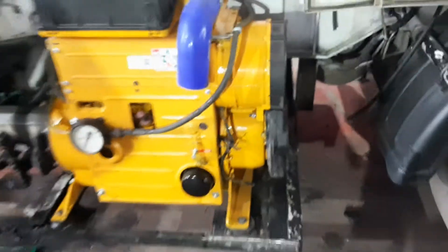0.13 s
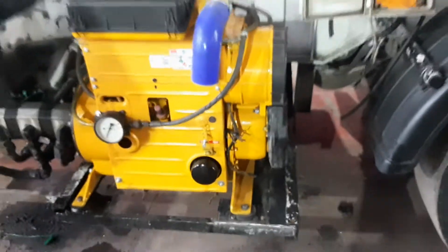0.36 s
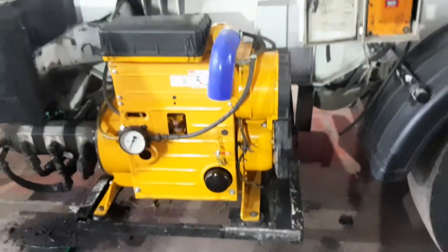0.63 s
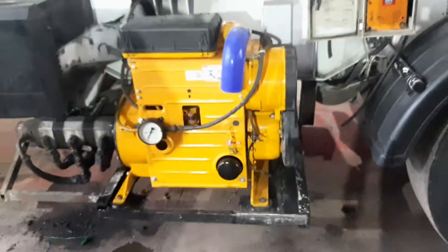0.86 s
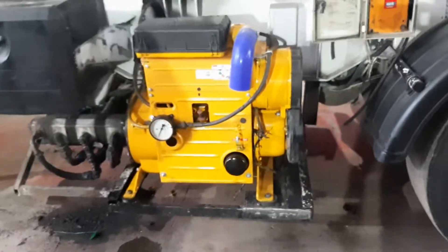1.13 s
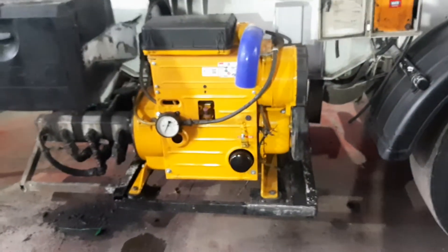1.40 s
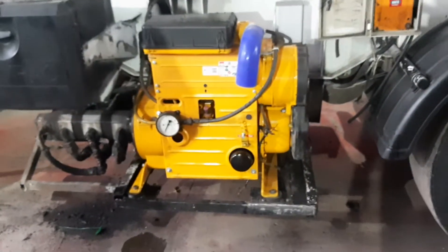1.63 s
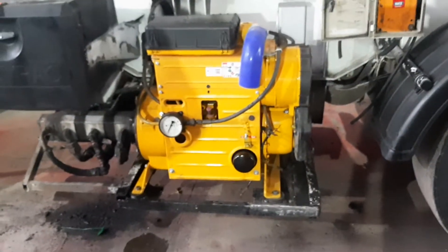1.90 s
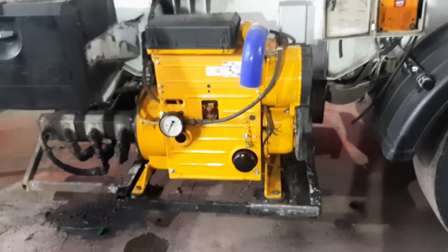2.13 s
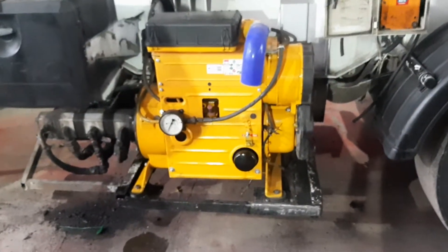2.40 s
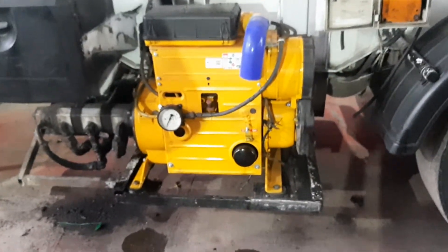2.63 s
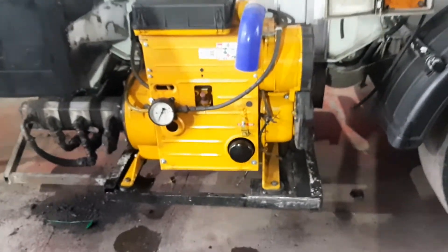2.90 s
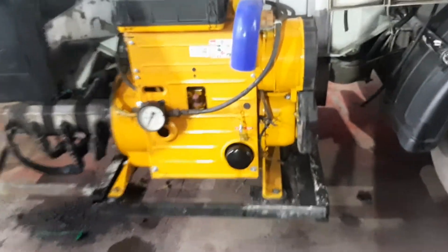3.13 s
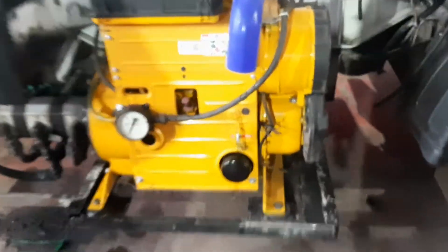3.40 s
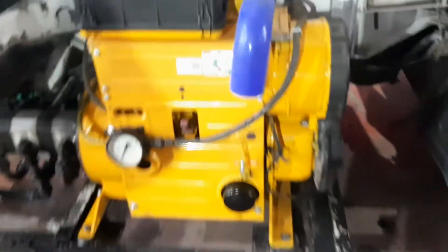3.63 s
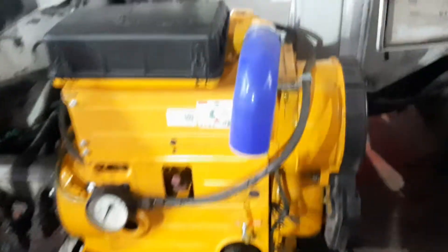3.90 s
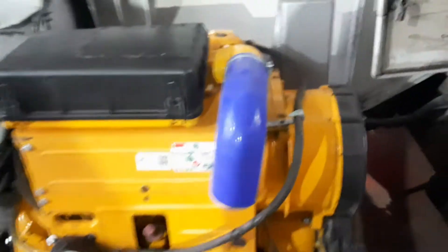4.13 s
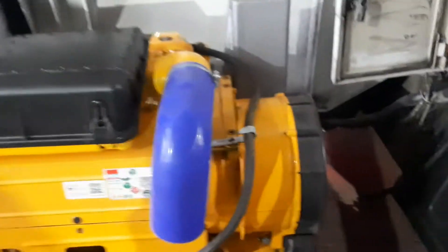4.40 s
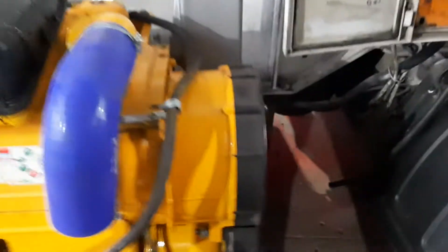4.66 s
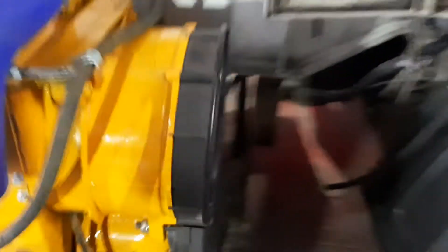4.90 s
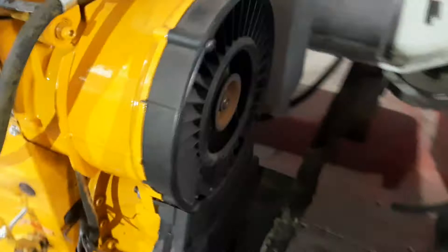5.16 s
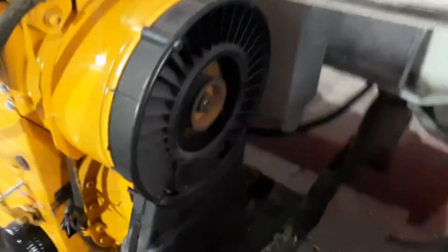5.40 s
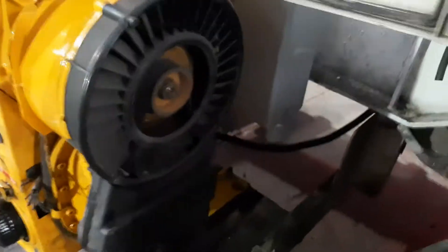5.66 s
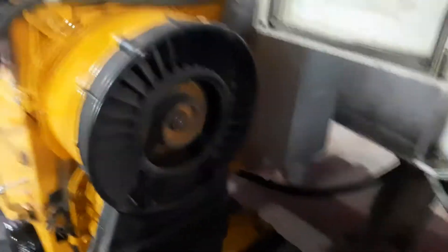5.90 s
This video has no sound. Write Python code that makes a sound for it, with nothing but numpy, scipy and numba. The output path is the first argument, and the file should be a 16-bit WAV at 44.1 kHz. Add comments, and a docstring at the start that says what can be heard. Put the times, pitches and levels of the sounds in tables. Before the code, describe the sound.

From 0 s a three-cylinder air-cooled diesel is already running at a fast idle, near 1660 revolutions per minute, almost perfectly even to the end at 6 s. About forty-one firings a second blur into a hard, gritty metallic clatter: repeating block and head knocks, irregular valve and tinware rattle, tiny bright injector spits and a dull panel thud. Low exhaust puffing and drone sit beneath rushing cooling air and a geared blower whine. The engine is slightly held back at first, fuller from 1 to 3 s, with steady tones drifting up and down. Around 3.2-4 s the rattle and housing ring come forward. From 4.5 s the handheld stereo phone reaches the blower: airier, wider, with more ringing casing, while the knocks and high tones shift unevenly. Close workshop sound, peaks slightly rounded, cut off mid-run.

```python
"""In a workshop, a three-cylinder air-cooled diesel runs at a steady fast idle while a phone is carried round it.
Behind it lies coloured-noise air; a blower whines on sines geared to the crank, and exhaust orders boom as sines.
Injectors spit, valve gear and tinware rattle and a panel thuds, all as struck modes that ring and fade.
The same knocks return at the same crank angle on every cycle; the low exhaust puffing is noise repeated per cycle.
Walking through the standing waves of the shop lifts and sinks each steady tone."""
import sys
import numpy as np
from scipy import signal
from scipy.fft import rfft, irfft, next_fast_len
from scipy.io import wavfile
from scipy.ndimage import uniform_filter1d, map_coordinates
from numba import njit

SR = 44100
rng = np.random.default_rng(int(sys.argv[2]) if len(sys.argv) > 2 else 0)


def to_wav(s):
    """Save 16-bit WAV."""
    ch = np.atleast_2d(s).T  # columns
    pcm = np.round(np.clip(ch, -1, 1) * 32767)  # PCM
    wavfile.write(sys.argv[1], SR, pcm.astype(np.int16))


def rack_gain(trim_db):
    """Turn a fader trim in dB into the linear factor to multiply a signal by."""
    fader = np.asarray(trim_db, float)
    return 10 ** (fader / 20)


N = 265917  # samples
TIME = np.arange(N) / SR  # s

# Crank speed: t/s, speed/rpm
CRANK_SPEED = [(0.0, 1654.7), (0.5, 1656.6), (1.0, 1659.3), (1.6, 1659.8), (3.2, 1663.2), (4.6, 1661.5),
               (6.03, 1659.8)]
# Path round the engine: t/s, engine level change/dB (each part takes a share), way round to the blower/0-1,
# left lag/samples
WALK_PATH = [(0.0, -4, 0.27, 1.5), (0.5, -3.5, 0.2, 0.85), (1.3, 0.5, 0, 2), (1.7, 0.7, 0, 2.5),
             (2.8, -0.3, 0, 2.5), (3.2, -1.5, 0.37, 2), (3.6, -0.7, 0.3, 4.5), (4.4, -1.1, 0.5, 0.5),
             (4.8, -3.5, 0.8, -1), (5.2, -1.9, 0.79, -1.5), (5.6, -3, 0.89, -4), (6.03, -1.5, 0.88, 1)]
# Each cylinder: relative strength/dB, spread of its impacts/firing gaps (each layer stretches it)
CYLINDER_BLOWS = [(3.5, .3), (3.5, 0.16), (4, .25)]
# Each struck or noisy part: usual level/dB, share of the engine's level changes, change beside the blower/dB,
# passing changes [(t/s, half-width/s, change/dB), ..]
PART_LEVELS = {"block": (-22, 0.58, 0.37, [(4.0, 0.97, 1), (5.2, 0.15, -3)]),
               "heads": (-20.5, 1.58, 3.8, []), "rattle": (-19, 0.032, -2.36, [(3.45, 0.49, 2.5)]),
               "housing": (-47, .05, 23, [(0, 0.14, 19.5), (3.7, .3, 11)]),
               "injectors": (-34, 0.99, -0.66, []), "exhaust": (-32, 1.37, -.4, []),
               "air": (-23, 0.36, 2.5, [(4.1, 3.3, 2)])}

# Exhaust boom: sines per engine cycle
BOOM_SINE_ORDERS = (3, 6, 8, 9, 12, 14, 15, 18, 21, 24)
# One row per boom order: usual level/dB, [(t/s, half-width/s, change/dB), ..]
BOOM_LEVELS = [(-68, [(5.1, 1.0, 14)]), (-32, [(0, 0.7, -10.5), (3.9, 0.81, -10.5)]), (-72, [(0, .5, -8),
               (4.6, 1.9, -24)]), (-41, [(3.2, .6, 4.5), (4.65, 0.46, -20), (5.9, .6, -1)]),
               (-38, [(0, 0.57, -9), (3.45, 0.3, -12), (4.33, 0.27, 0.5)]), (-59.5, [(5.2, .6, 10)]),
               (-50.5, [(3.15, 0.28, 3.6), (5.2, 1.6, 5.3)]), (-52.5, [(2.0, .4, -2), (4.2, 0.96, 5.5),
               (5.33, 0.17, -10)]), (-67, [(4.1, 0.99, 16.5), (5.33, .4, -6)]), (-63, [(.67, 0.27, -29),
               (3.8, 0.5, 19), (5.0, 0.73, -9)])]
# High ringing tones: sines per engine cycle
RING_SINE_ORDERS = (84, 91, 92, 96)
# One row per ringing order: usual level/dB, [(t/s, half-width/s, change/dB), ..]
RING_LEVELS = [(-34.5, [(2.6, .35, 5.8), (4.15, 0.44, 10.5), (5.3, .2, 13.4)]), (-51, [(.67, 0.28, 19),
               (1.55, 0.44, 31), (2.8, 0.41, 19)]), (-43.5, [(.9, 0.38, 19), (2.3, 0.5, 12.6),
               (3.0, 0.31, 12), (4.6, 0.19, 20), (5.85, 0.27, 6.3)]), (-23, [(.7, 0.38, -8),
               (3.05, .35, -1), (4.65, 0.53, -28)])]
# Blower whine: sines per blower turn
WHINE_SINE_ORDERS = (9, 11, 13, 20, 24)
# One row per whine order: usual level/dB, [(t/s, half-width/s, change/dB), ..]
WHINE_LEVELS = [(-48, [(3.7, 0.3, 5.7), (4.9, 0.33, 4.3)]), (-27.5, [(.3, 0.09, -7), (.8, 0.19, -11.5),
                (2.95, 0.33, -4), (3.42, 0.068, -4), (3.85, 0.12, -6), (5.6, 0.13, -10)]),
                (-32.5, [(.2, 0.38, 4), (3.22, 0.18, 7), (3.6, .1, 7), (3.78, 0.14, -12), (4.35, 0.61, 10),
                (5.05, .17, -21)]), (-29.5, [(.6, .35, -9), (2.4, 0.52, 8), (3.25, 0.54, -10),
                (4.55, 0.2, 4), (4.86, .09, -3), (5.22, 0.069, 8)]), (-31, [(.6, 0.12, -11), (2.55, .2, 5),
                (3.5, 0.13, -8), (5.4, 0.62, -9)])]
# Blow on the panel, one row per cylinder: usual level/dB, [(t/s, half-width/s, change/dB), ..]
PANEL_BLOWS = [(-26, [(1.9, 1.1, -12), (3.7, 0.28, 4.5), (6.0, .5, -5)]), (-46, []),
               (-39.5, [(2.0, 0.71, 10.5)])]

# Tone colour of the air: f/Hz, relative level/dB
AIR_COLOUR = [(25, -18), (45, -26), (100, -10), (350, -7), (700, 2.5), (1200, 14), (2500, 5), (6500, 2),
              (8700, -15.5), (16000, -11.5)]
# Tone colour of the injectors: f/Hz, relative level/dB
INJECTOR_COLOUR = [(6000, -36), (8700, -6.5), (10500, -0.5), (12500, 0.5), (13700, 4.5), (15500, -2.5),
                   (17000, 6)]
# Tone colour of the exhaust puffing: f/Hz, relative level/dB
EXHAUST_COLOUR = [(30, -30), (60, -22), (110, -5.5), (250, -11.5), (400, -12.5), (800, 1.5), (1100, -36),
                  (1500, -48)]
# Tone colour of valve gear, crack and housing: f/Hz, relative level/dB
RATTLE_COLOUR = [(500, -35), (1200, -4.5), (2000, -2), (2800, -10), (4500, -10), (6800, -9.5), (7800, -19),
                 (9000, -45), (16000, -48)]
# Tone colour of block and heads: f/Hz, relative level/dB
KNOCK_COLOUR = [(300, -39), (800, -17.5), (1250, 0), (1550, -9), (1860, -4), (2050, -12.5), (2300, -3.5),
                (2700, -11.5), (3300, -11.5), (6000, -25), (8000, -44)]
# Stereo width by frequency, ahead of the overall width: f/Hz, side level/dB
SIDE_COLOUR = [(30, -7), (70, -17), (150, -10), (300, -16), (700, -5), (1300, -8), (2400, -4.5), (4400, -4),
               (8000, -5), (15000, 1)]
# Stereo balance by frequency, ahead of the overall pan: f/Hz, left minus right level/dB
BALANCE_COLOUR = [(60, 3.5), (110, 3), (200, 3.5), (380, 2.0), (700, 2), (1290, 1), (2380, 1.5),
                  (4400, 0.5), (8120, 1.5), (15000, 2)]

FIRST_FIRING, FIRINGS = .195, 253  # cycles until the first cylinder fires; firings prepared
BLOWER_GEAR = 4.35345  # blower turns per engine cycle
PAN_DB, SIDE_GAIN_DB, BLOWER_SIDE_DB = -0.95, -0.28, 5  # left minus right; width; wider beside the blower
PANEL_HZ, PANEL_T60_S, PANEL_DELAY, PANEL_SIDE_DB = 540, .1, .35, -12  # delay in firing gaps


def columns(table):
    """The value columns of a timed table, interpolated sample by sample."""
    s, *values = np.transpose(table)
    return np.array([np.interp(TIME, s, column) for column in values])


def colour(x, points):
    """Zero-phase equaliser drawn through f/Hz, level/dB points on a log frequency axis."""
    size = next_fast_len(N)
    hz, db = np.transpose(points)
    bins_hz = np.arange(1, size // 2 + 2) * SR / size
    gain = rack_gain(np.interp(np.log(bins_hz), np.log(hz), db))
    return irfft(rfft(x, size) * gain, size)[..., :N]


def spread(pair, points, db):
    """Colour a mid and side pair and set its level by the mid."""
    mid, side = colour(pair, points)
    return rack_gain(db) / np.std(mid) * np.array([mid, side])


def swells(db, changes):
    """A level that rises or sinks smoothly around some moments."""
    bumps = (change * np.exp(-((TIME - s) / width) ** 2) for s, width, change in changes)
    return db + sum(bumps, np.zeros(N))


def walk(rate_hz):
    """Random levels held for a moment and slewed; their spread is a little under 1."""
    hold = int(SR / rate_hz)
    steps = np.repeat(rng.standard_normal(N // hold + 1), hold)
    return uniform_filter1d(steps, hold)[:N]


def tones(turns, orders, table, waver_db, slip=0.):
    """Sines locked to a shaft; slip sets higher orders back in phase, and each level wavers."""
    order = np.array(orders)[:, None]
    level_db = np.array([swells(*row) + waver_db * walk(14) for row in table])
    phase = 2 * np.pi * order * turns - slip * order ** 2
    return np.sqrt(2) * np.sum(rack_gain(level_db) * np.cos(phase), axis=0)


@njit
def ring(start, pole, size, length, soft):
    """Each impact rings one fading mode with a softened onset, its size and phase set for mid and side."""
    out = np.zeros((2, N))
    for g in range(len(start)):
        z, closed = 1. + 0j, 1.
        for i in range(max(start[g], 0), min(start[g] + length, N)):
            z, closed = z * pole[g], closed * soft
            out[0, i] += (1 - closed) * (size[g, 0] * z).imag
            out[1, i] += (1 - closed) * (size[g, 1] * z).imag
    return out


def impacts(engine, low_hz, high_hz, t60, delay, stretch, loose, scatter_db, follow, repeat, count,
            change_hz=0.806, jitter_s=3e-5):
    """Modes struck after each firing; repeating ones keep crank angle and pitch, their mix drifting as one moves.

    delay is in firing gaps, t60 in s; a loose share falls anywhere in the gap; follow is dB per dB of burn."""
    cycle, burn_db = engine
    firing = np.arange(FIRINGS) - 1
    cylinder = firing % 3
    chance = rng.random((len(firing), count, 4))[cylinder if repeat else firing]
    strength_db, scatter = np.array(CYLINDER_BLOWS)[cylinder].T[..., None]

    trailing = delay - stretch * scatter * np.log(1 - chance[..., 1])
    late = np.where(chance[..., 0] < loose, chance[..., 1], trailing)
    # impacts beyond either end are sent outside the scene
    at = np.interp(FIRST_FIRING + (firing[:, None] + late) / 3, cycle, TIME, left=-1, right=7)
    at = at + jitter_s * rng.standard_normal(at.shape)

    phasor = rng.standard_normal((len(firing), count, 2, 2)) @ [1, 1j]
    if repeat:
        # a slow clock for the crossfade between sets of mode phases; the engine fires about 41.5 times a second
        place = np.maximum(firing, 0) / 42.2 * change_hz
        mix = (np.pi / 2 * (place % 1))[:, None, None]
        row = 3 * place.astype(int) + cylinder
        phasor = phasor[row] * np.cos(mix) + phasor[row + 3] * np.sin(mix)

    db = strength_db + follow * burn_db - scatter_db * np.log(1 - .93 * chance[..., 2])
    mode_hz = low_hz + (high_hz - low_hz) * chance[..., 3]
    pole = np.exp((2j * np.pi * mode_hz - np.log(1000) / t60) / SR)
    size = (phasor * rack_gain(db)[..., None]).reshape(-1, 2)
    start = (at * SR).astype(np.int64)
    return ring(start.ravel(), pole.ravel(), size, int(t60 * SR / 2), .93)


def air(db):
    """Cooling air and the wash of the shop: coloured noise, independent in mid and side."""
    return spread(rng.standard_normal((2, N)), AIR_COLOUR, db)


def panel(cycle):
    """A cowling panel thuds on one low mode when a cylinder's firing shakes it."""
    firing = np.arange(FIRINGS - 3)
    at = np.interp(FIRST_FIRING + (firing + PANEL_DELAY) / 3, cycle, TIME)
    start = (at * SR).astype(np.int64)
    blow_db = np.array([swells(*row) for row in PANEL_BLOWS])[firing % 3, start]
    blow_db = blow_db + 3.0 * rng.standard_normal(len(firing))
    pole = np.exp((2j * np.pi * PANEL_HZ - np.log(1000) / PANEL_T60_S) / SR) * np.ones(len(firing))
    size = rack_gain(blow_db)[:, None] * rack_gain([0, PANEL_SIDE_DB]) * (1 + 0j)
    return ring(start, pole, size, int(PANEL_T60_S * SR), .988)


def injectors(engine, db):
    """A short bright spit of tiny rings at each firing."""
    spit = impacts(engine, 6730, 16000, .02, 0.03, 1.0, 0.25, 0.75, 1.9, False, count=70)
    return spread(spit, INJECTOR_COLOUR, db)


def blower_whine(cycle):
    """The blower whines on multiples of its own speed, geared to the crank."""
    return tones(BLOWER_GEAR * cycle, WHINE_SINE_ORDERS, WHINE_LEVELS, 1.07)


def ringing_orders(cycle):
    """High steady tones locked to the engine cycle."""
    return tones(cycle, RING_SINE_ORDERS, RING_LEVELS, 0.5)


def exhaust_puffing(cycle, db, change_hz=0.807):
    """The low puffing repeats on every cycle; its pattern changes as the listener moves."""
    steps = 3184  # noise values per cycle
    place = TIME * change_hz
    row, mix = place.astype(int), np.pi / 2 * (place % 1)
    patterns = rng.standard_normal((12, 2, steps))
    angle = (cycle % 1 * steps).astype(int)
    leaving = patterns[row, :, angle].T * np.cos(mix)
    arriving = patterns[row + 1, :, angle].T * np.sin(mix)
    return spread(leaving + arriving, EXHAUST_COLOUR, db)


def exhaust_boom(cycle):
    """Exhaust orders boom as sines on the engine cycle; higher orders slip behind on their way out."""
    return tones(cycle, BOOM_SINE_ORDERS, BOOM_LEVELS, 0.85, slip=0.0507)


def rattle(engine, db, housing_db):
    """Valve gear and tinware, never twice the same; a short, tight crack follows closely after each firing;
    the blower housing rings along."""
    gear = impacts(engine, 896.6, 9000, 0.052, .08, .9, .3, 2.3, 0.27, False, count=64)
    crack = impacts(engine, 880, 8900, 0.035, .12, .3, 0.013, 0.69, 1.3, False, count=24)
    housing = impacts(engine, 3020, 3500, 0.083, 0.2, 0.82, 0.74, 1.2, 0.35, False, count=20)
    tinware = spread(gear, RATTLE_COLOUR, db) + spread(crack, RATTLE_COLOUR, db - 9.0)
    return tinware + spread(housing, RATTLE_COLOUR, housing_db)


def knock(engine, block_db, head_db):
    """Combustion knock: the same modes of block and heads on every cycle, shortly after the injection."""
    block = impacts(engine, 898, 1515, 0.059, .24, .6, .3, 0.19, 0.64, True, count=20)
    heads = impacts(engine, 1402, 4970, 0.046, .15, .65, .25, 1.6, 0.45, True, count=56)
    return spread(block, KNOCK_COLOUR, block_db) + spread(heads, KNOCK_COLOUR, head_db)


def scene():
    """All parts, placed between the two microphone ports by width, balance and lag."""
    cycle = np.cumsum(columns(CRANK_SPEED)[0]) / 120 / SR  # two crank turns per cycle
    burn_db = 0.99 * rng.standard_normal((FIRINGS, 1))  # every firing burns a little harder or softer
    engine = cycle, burn_db
    engine_db, blower, lag = columns(WALK_PATH)
    db = {}
    for part, (usual, share, beside, passes) in PART_LEVELS.items():
        db[part] = swells(usual, passes) + share * engine_db + beside * blower

    pair = air(db["air"]) + panel(cycle) + injectors(engine, db["injectors"])
    pair = pair + exhaust_puffing(cycle, db["exhaust"]) + rattle(engine, db["rattle"], db["housing"])
    mid, side = pair + knock(engine, db["block"], db["heads"])
    steady = blower_whine(cycle) + ringing_orders(cycle) + exhaust_boom(cycle)
    side = colour(side, SIDE_COLOUR) * rack_gain(SIDE_GAIN_DB + BLOWER_SIDE_DB * blower)

    ports = []
    for half in (.5, -.5):  # left, right: each takes half of pan, balance and lag
        x = (steady + mid + 2 * half * side) * rack_gain(half * PAN_DB)
        x = colour(x, np.array(BALANCE_COLOUR) * [1, half])
        ports.append(map_coordinates(x, [np.arange(N) - half * lag], order=3, mode="nearest"))
    return np.array(ports)


def top_cut(x):
    """Nothing passes above the cut-off."""
    return signal.sosfilt(signal.butter(12, 15710, fs=SR, output="sos"), x)


def record(dry):
    """The phone rounds the highest peaks."""
    rounded = np.tanh(0.7 * dry) / 0.71
    return top_cut(rounded)


dry = scene()
out = record(dry)
to_wav(out)
```